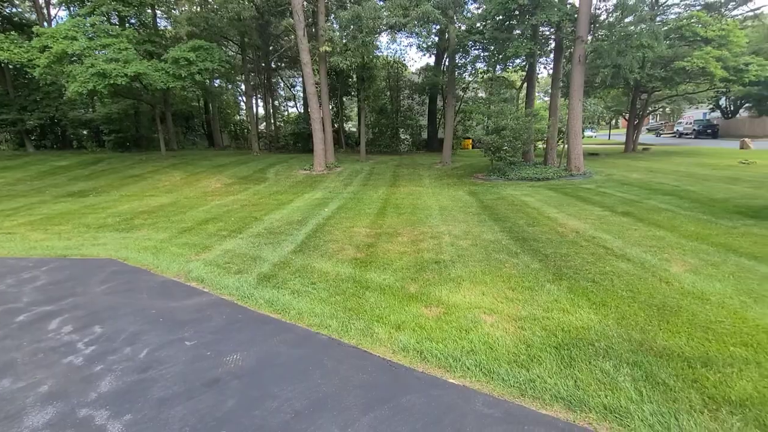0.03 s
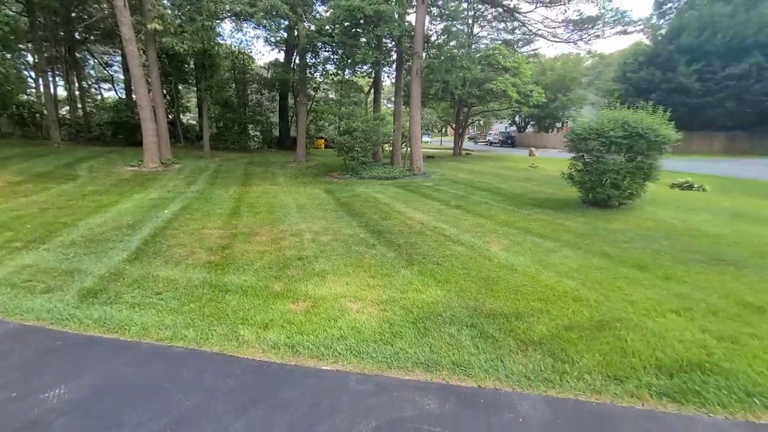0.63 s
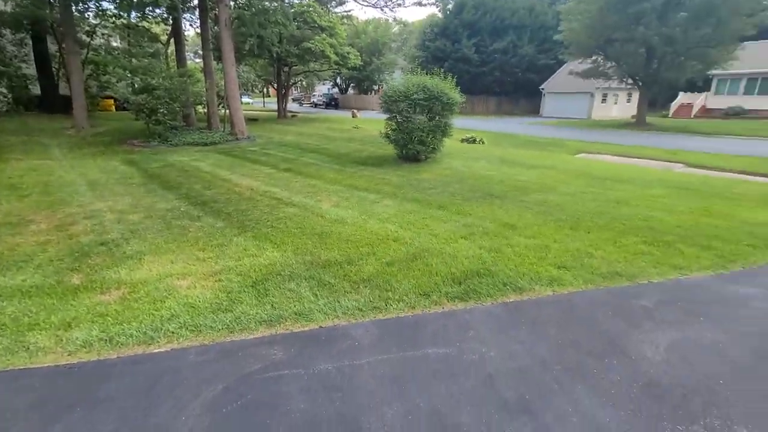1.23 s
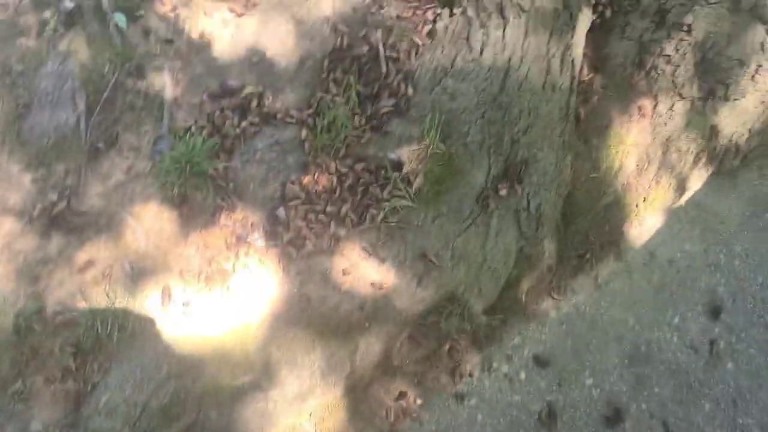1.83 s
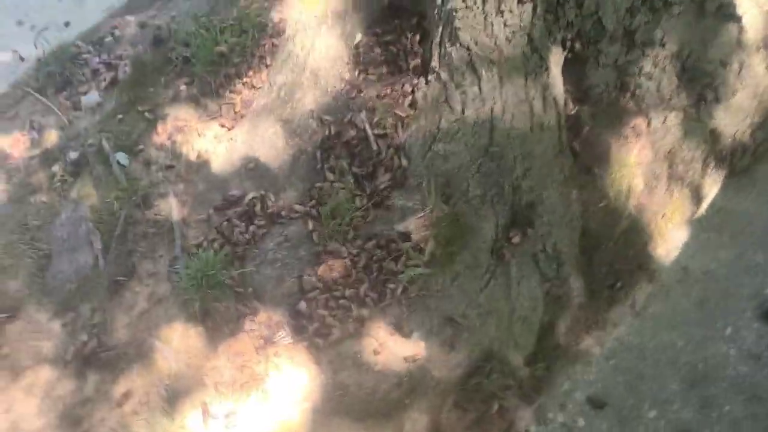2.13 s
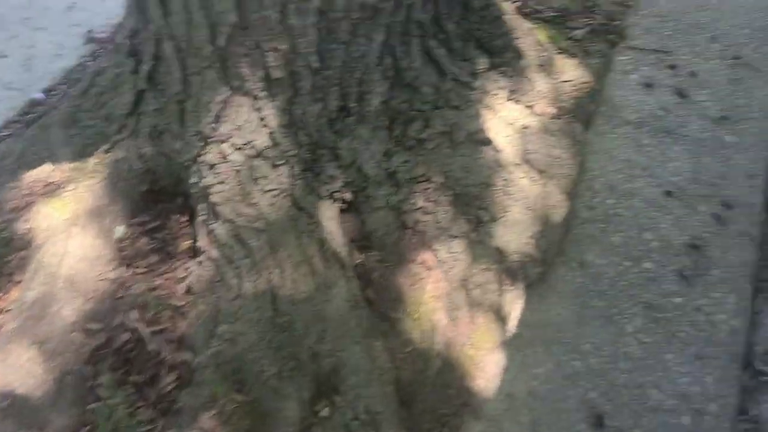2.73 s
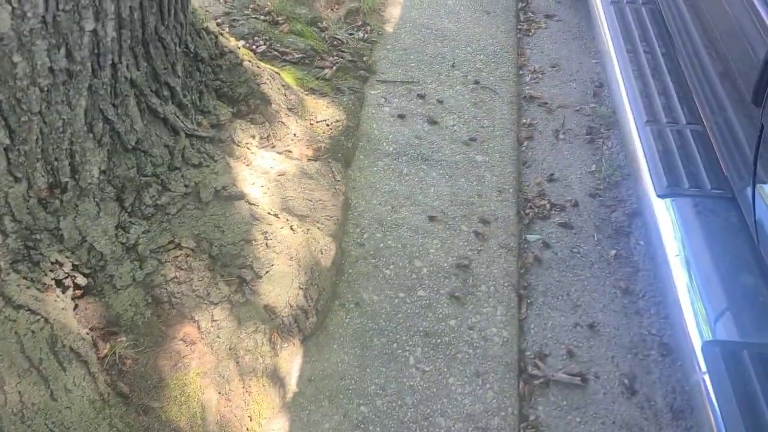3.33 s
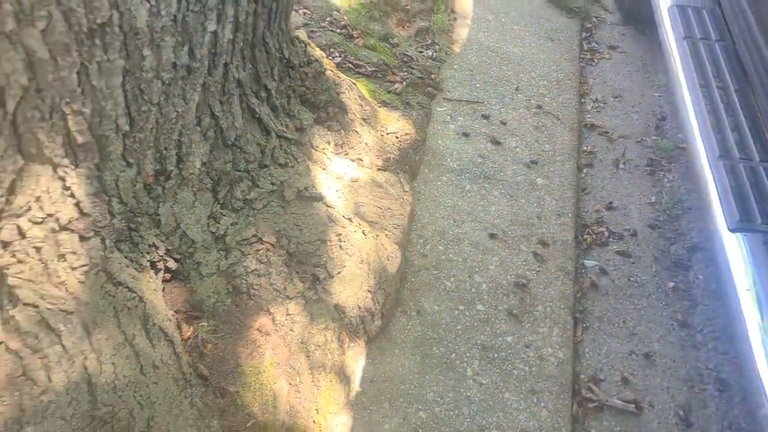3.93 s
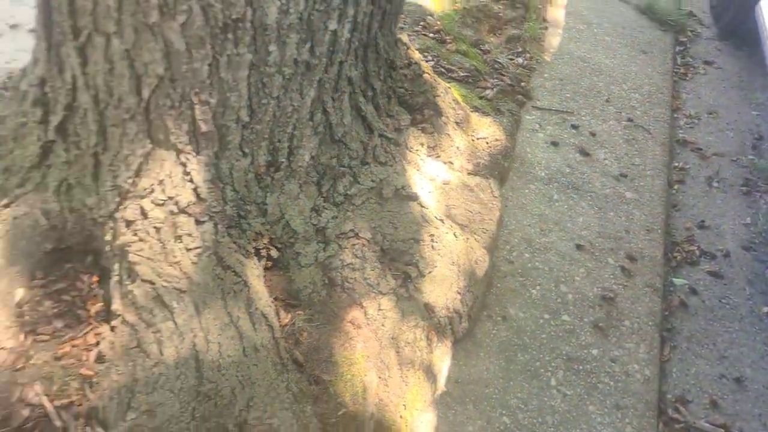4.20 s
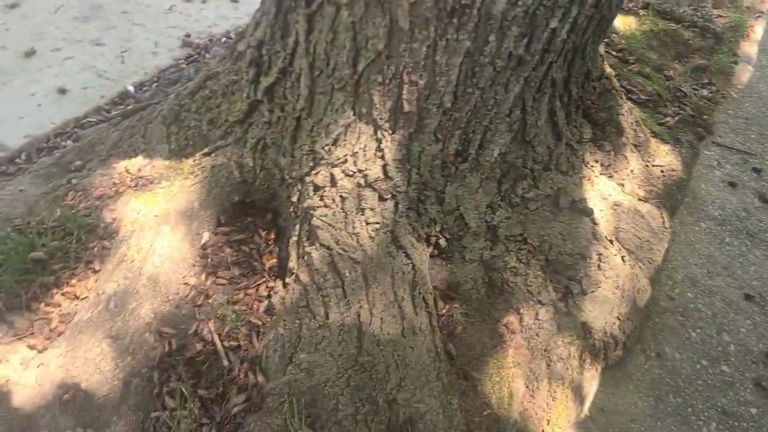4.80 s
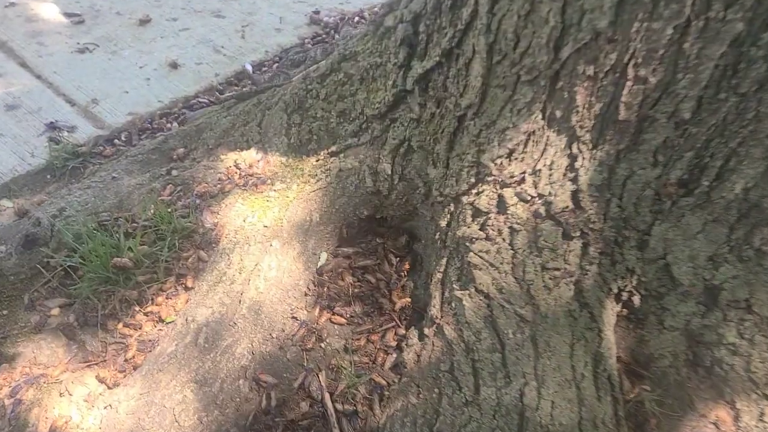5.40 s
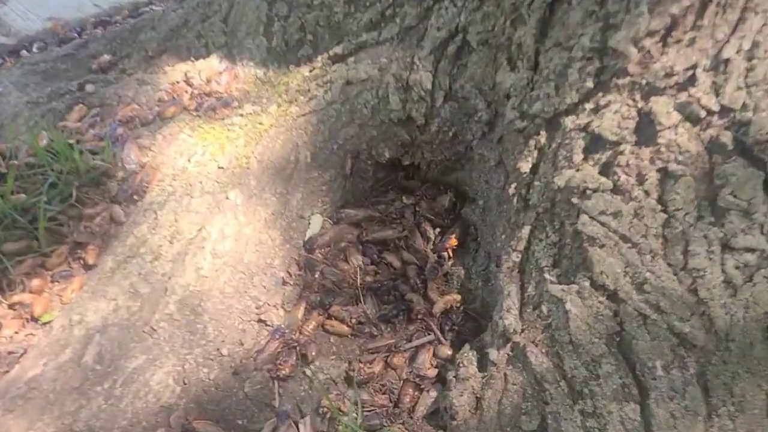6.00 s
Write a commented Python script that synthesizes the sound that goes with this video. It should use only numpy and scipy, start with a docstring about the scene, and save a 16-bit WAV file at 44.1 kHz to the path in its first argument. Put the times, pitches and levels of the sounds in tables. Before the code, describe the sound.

Cicadas drone and buzz in trees, then continue behind an idling truck's hum and fan rush as shoes crackle over dry leaves.

```python
"""Cicadas sing in suburban trees: a far, hollow drone near 1.3 kHz and a nearer, rasping buzz near 6 kHz,
made by tiny drum skins (tymbals) that click and ring their hollow bodies. We hear them first on a lawn,
where fingers knock on the hand-held phone. After an instant of silence we hear them under a street tree:
a parked truck idles, its fan rushing on the right, shoes scuff over grit and dry leaves, and a far
bird chirps."""
import sys
import numpy as np
from scipy import signal
from scipy.fft import rfft, irfft, next_fast_len
from scipy.io import wavfile
from scipy.ndimage import uniform_filter1d, map_coordinates

SR = 44100
rng = np.random.default_rng(int(sys.argv[2]) if len(sys.argv) > 2 else 0)


def generate_wav(sig):
    """Save sig (samples, or channels by samples) to the path in sys.argv[1] as 16-bit PCM at SR."""
    pcm = np.round(np.clip(np.atleast_2d(sig).T, -1, 1) * 32767).astype(np.int16)
    wavfile.write(sys.argv[1], SR, pcm)


N = 271215
TIME = np.arange(N) / SR
HIT_TIME = np.arange(-256, SR // 6) / SR  # seconds around one hit, with the contact at 0
LAWN_END_S, STREET_START_S = 1.435, 1.491

# Levels in dB are relative: 0 changes nothing. Pan is left minus right, so below 0 is to the right.
# How the droning cicadas spread over pitch. Each row: pitch in Hz, level in dB.
DRONE_PITCHES = [(1080, -19), (1170, -10.5), (1245, -7.3), (1320, -0.3), (1378, -4.5), (1440, -11),
                 (1510, -21.5), (1580, -28)]
# How a buzzing cicada's tymbals and body ring. Each row: frequency in Hz, level in dB.
CICADA_BODY = [(2600, -38), (3700, -17), (4700, -10.5), (5500, -0.5), (6250, 3.5), (6850, -4.5),
               (7500, -19.5), (8400, -23.5), (9400, -44), (12000, -22.5), (14000, -32), (16000, -40)]
# Waves of buzzing on the lawn. Each row: crest in seconds, half length in seconds, rise in dB.
LAWN_WAVES = [(0.12, 0.16, 3), (0.79, 0.24, 3.8), (1.319, 0.26, 7.7)]
# Waves of buzzing in the street. Each row: crest in seconds, half length in seconds, rise in dB.
STREET_WAVES = [(2.15, .27, 5), (2.787, 0.45, 8), (3.53, 0.2, 7.5), (4.42, 0.48, 11.5), (4.561, .09, 3),
                (5.15, 0.29, 6.5), (6.099, 0.27, 4.5)]
# How leaves dull the buzz in the street. Each row: frequency in Hz, level in dB.
FOLIAGE = [(4800, 2), (5700, 2.5), (6400, -1), (7200, -5)]

# The engine's tones (harmonics). Each row: multiple of the firing rate, level in dB.
HARMONICS = [(1, -35), (2, -11.5), (3, -6), (4, 0.15), (5, 1.5), (6, -22), (7, -11.5), (8, -17.5), (9, -17),
             (10, -11), (11, -21), (12, -14.5), (13, -30), (14, -29), (15, -35), (19, -24.5), (20, -14.5),
             (21, -22), (22, -33)]
# The exhaust at the moving phone. Each row: time in seconds, dB for harmonics 1-4, dB for 5-7.
EXHAUST_LEVELS = [(1.5, -30, -30), (2.1, -31.5, -39.5), (2.6, -26.5, -33.5), (3.0, -29, -29.5),
                  (3.35, -29, -25), (3.8, -28.5, -30.5), (4.4, -25.5, -24.5), (4.85, -29, -26.5),
                  (5.2, -36.5, -32.5), (5.6, -29.5, -26), (6.15, -32, -33.5)]
# The truck's droning body panels. Each row: time in seconds, level in dB.
PANEL_LEVELS = [(1.5, -29.5), (1.85, -33), (2.1, -24.5), (2.5, -26.5), (2.9, -28), (3.45, -35.5),
                (4.1, -35.5), (4.6, -36), (6.15, -37.5)]
# The uneven exhaust rumble. Each row: frequency in Hz, level in dB per Hz.
RUMBLE_COLOUR = [(18, -80), (30, -63), (42, -48), (54, -47), (72, -49), (96, -51.5), (120, -56.5),
                 (142, -63.5), (170, -61), (250, -66), (340, -77), (700, -100.5)]
# The rush of the fan. Each row: frequency in Hz, level in dB per Hz.
FAN_COLOUR = [(150, -78), (330, -71.5), (460, -68), (600, -67), (800, -63.5), (1100, -61.5), (1600, -68),
              (1950, -71), (2800, -78.5), (4200, -85), (7500, -96.5), (16000, -111)]
# The treble in that rush. Each row: time in seconds, boost in dB.
FAN_TREBLE = [(1.5, -3), (2.3, 0), (3.0, -0.5), (3.9, -0.5), (4.25, 1.5), (5.3, 1.5), (6.15, 2)]
# The thin hiss beside the truck. Each row: frequency in Hz, level in dB.
HISS_COLOUR = [(2000, -2), (6000, 10.5), (9000, 1.5), (10300, 10.5), (13000, 4), (16000, -1.5)]
# How loud that hiss is. Each row: time in seconds, level in dB.
HISS_LEVELS = [(1.5, -84), (2.2, -70), (2.7, -57.5), (3.4, -54.5), (3.8, -54), (4.25, -56.5), (5.2, -58),
               (6.15, -62)]

# Soft footfalls. Each row: start in seconds, peak in dB.
STEPS = [(5.352, -23.5), (5.444, -27), (5.631, -28.5)]
# A footfall's thud. Each row: frequency in Hz, level in dB.
THUD_COLOUR = [(80, -5), (260, 8), (340, -0.5), (480, -8), (1000, -20), (5000, -33), (14000, -52)]
# Grit crunches under a full sole. Each row: start in seconds, peak in dB, fade time in seconds.
CRUNCHES = [(4.140, -36, 0.11), (5.446, -30, 0.011), (5.614, -33, .06)]
# The tone of a crunch. Each row: frequency in Hz, level in dB.
CRUNCH_COLOUR = [(1200, -14), (2400, -5), (3400, 9), (5000, 3), (8000, -7), (12000, -9), (16000, -18)]
# Dry leaves crack. Each row: start in seconds, peak in dB, pan in dB.
LEAF_CRACKS = [(1.849, -37, 3.5), (2.271, -38, 0), (2.320, -39, -3), (2.336, -33, -6), (2.430, -39, -5),
               (2.632, -40, -6), (3.177, -34, -8), (3.282, -27, -9), (3.346, -38, -6), (3.424, -36, -7),
               (4.051, -39, -6), (4.650, -37, -7), (4.784, -37, -6), (4.811, -35, -9), (5.321, -36, -6),
               (5.344, -37, -6), (5.367, -37, -6), (5.394, -39, -5), (5.429, -36, -8), (5.434, -32, -5),
               (5.474, -32, -9), (5.489, -28, -8), (5.559, -32, -5), (5.607, -35, -5), (5.637, -32, -4),
               (5.671, -35, -4), (5.727, -33, -5), (5.764, -30, 0), (5.793, -25, -1), (5.856, -30.5, -11),
               (6.120, -35, -5)]
# The tone of cracking leaves and ticking grit. Each row: frequency in Hz, level in dB.
CRACK_COLOUR = [(1000, -21), (2400, 1), (3000, 2), (4500, -2), (8000, 0), (11500, 7.5), (14000, 2),
                (16000, -4)]
# A snapped twig rings. Each row: pitch in Hz, level in dB, fade time in seconds.
TWIG_TONES = [(3150, -2.5, 0.011), (4350, -5, 0.0027), (6000, 0, 0.003), (7500, -1, 0.0016),
              (10700, -1.5, 0.0017), (13600, -7, .002)]
# Soles scuff. Each row: middle in seconds, half length in seconds, level in dB, pan in dB.
SCUFFS = [(1.66, 0.096, -53.5, 12), (1.855, .02, -53, 3), (2.07, 0.087, -53.5, 9),
          (2.340, 0.009, -43.5, -6), (2.358, .014, -52, -6), (2.443, 0.086, -51, -5),
          (3.282, .012, -47, -8), (3.44, .09, -57, -7), (4.56, .07, -55, -8), (4.79, .03, -56, -7),
          (5.46, 0.1, -52, -4), (5.620, .014, -52, -6), (5.75, 0.08, -54, -1), (6.036, .04, -55, 1)]
# The tone of a scuff. Each row: frequency in Hz, level in dB.
SCUFF_COLOUR = [(2000, -10), (4000, 1), (6000, 9), (9000, -1.5), (11500, 4), (13000, 2), (16000, -7)]
# Whole leaves crumple. Each row: middle in seconds, half length in seconds, level in dB, pan in dB.
RUSTLES = [(3.47, .13, -59, -7), (3.82, .16, -60, -7), (5.49, .08, -52, -6), (5.76, .07, -53, -2)]

# Knocks on the phone. Each row: start in seconds, ring level in dB, tick in dB above that, pan in dB.
KNOCKS = [(0.950, -29.5, 4, 14), (0.956, -27, 3, 6), (1.098, -31, 16.5, 10), (1.178, -34.5, 3, 0),
          (1.225, -35, 5, 5)]
# The phone's case rings. Each row: pitch in Hz, level in dB, fade time in seconds.
CASE_TONES = [(515, -3, 0.039), (611, -8, 0.037), (744, -8, 0.037)]
# A fingertip's tick. Each row: frequency in Hz, level in dB.
TICK_COLOUR = [(250, -7), (550, 10.5), (1050, 3), (2000, 5), (2650, -2), (3200, 2.5), (4600, -2),
               (7000, -15), (15000, -25)]
# The far bird's chirps. Each row: middle in seconds, pitch in Hz, peak in dB.
CHIRPS = [(4.155, 3050, -49), (4.165, 3550, -51), (4.37, 2550, -48), (4.39, 3350, -54), (4.515, 3400, -49),
          (4.65, 3400, -51), (5.20, 2790, -48.5), (5.32, 2950, -47), (5.675, 3100, -48.5)]
# Far traffic and neighbourhood noise on the lawn. Each row: frequency in Hz, level in dB per Hz.
TRAFFIC_COLOUR = [(20, -84), (45, -69), (75, -58.5), (120, -70), (250, -74.5), (350, -82.5), (650, -86.5),
                  (950, -73.5), (1900, -78), (2800, -90), (6000, -86.5), (16000, -108)]
# How unlike the two microphones sound. Each row: frequency in Hz, their difference over their sum in dB.
STEREO_WIDTH = [(60, -23), (110, -11.5), (200, -10.5), (380, -8), (700, -4), (1290, 2), (2400, 0.5),
                (8000, 1.5)]


def cicada_drone(count=56, drift=.008, flutters_per_s=32):
    """Each far cicada holds a near-pure note; paths through leaves make it flutter differently per side."""
    pitches, levels_db = np.transpose(DRONE_PITCHES)
    chorus = np.zeros((2, N))
    for hz in np.linspace(pitches[0], pitches[-1], count):
        pitch_hz = hz * (1 + drift * wander(3))
        phase = 2 * np.pi * (np.cumsum(pitch_hz) / SR + rng.random())
        voice = np.array([np.sin(phase) * wander(flutters_per_s), np.cos(phase) * wander(flutters_per_s)])
        chorus += gain(np.interp(hz, pitches, levels_db)) * voice
    return normalise(surround(chorus))


def cicada_buzz(count=24, clicks_per_s=330, jitter=.12):
    """Many tymbals buckle in quick, uneven runs of clicks; each click rings the insect's body."""
    clicks = np.zeros((2, N))
    for insect in range(count):
        rate = clicks_per_s * rng.uniform(.7, 1.3)
        times = np.cumsum(1 + jitter * rng.standard_normal(4000)) / rate
        samples = (np.abs(times[times < N / SR]) * SR).astype(int)
        clicks[insect % 2, samples] += rng.standard_normal(len(samples))
    return normalise(colour(clicks, CICADA_BODY))


def chorus_waves(buzz, waves, usual_effort_db, speedup_per_db=.003):
    """Waves run through the chorus: the harder the cicadas sing, the louder and higher they buzz."""
    effort_db = sum(db * swell(s, half_s) for s, half_s, db in waves)
    position = np.cumsum(1 + speedup_per_db * (effort_db - usual_effort_db))  # faster sounds higher
    bent = np.array([map_coordinates(side, [position], order=5, mode="mirror") for side in buzz])
    return bent * gain(effort_db)


def truck_engine(idle_hz=22.0, sag_hz_per_s=.305, unsteadiness=.00068, waver_db=.84):
    """The slowly settling engine fires, sounding the exhaust and body panels over an uneven rumble."""
    elapsed = np.maximum(TIME - STREET_START_S, 0)
    firing_hz = (idle_hz - sag_hz_per_s * elapsed) * (1 + unsteadiness * wander(5.12))
    phase = 2 * np.pi * np.cumsum(firing_hz) / SR
    low_db, middle_db = curves(EXHAUST_LEVELS)
    panel_db, = curves(PANEL_LEVELS)
    # The panels send their highest tones in a narrow beam; outside it they are 9 dB softer.
    beam_db = panel_db + 9 * (swell(2.25, half_s=.21) - 1)
    tones = np.zeros(N)
    for multiple, db in HARMONICS:
        if multiple <= 7:
            level_db = low_db if multiple <= 4 else middle_db
        else:
            level_db = panel_db if multiple <= 14 else beam_db
        loudness = gain(db + level_db + waver_db * wander(2.995))
        tones += loudness * np.sin(multiple * phase + 2 * np.pi * rng.random())
    rumble = outdoor_noise(RUMBLE_COLOUR) * gain(.5 - .4 * elapsed)  # fades as the phone moves on
    return (tones + rumble) * pan(-1.2)


def truck_fan(fall_db_per_s=.8, flicker_db=.5, shadow_hz=1100, treble_hz=2600):
    """The cooling fan rushes under the bonnet; the phone shades its left microphone from the treble."""
    level_db = 1.53 - fall_db_per_s * (TIME - STREET_START_S)
    level_db -= 1.7 * swell(3.4, half_s=.64)  # the phone swings away
    rush = outdoor_noise(FAN_COLOUR) * gain(level_db + flicker_db * wander(12))
    treble_db, = curves(FAN_TREBLE)
    treble = colour(rush, [(treble_hz / 2, -25), (treble_hz, 0), (treble_hz * 1.6, 0), (treble_hz * 2, -15)])
    rush += treble * (gain(treble_db) - 1)
    bass = colour(rush, [(shadow_hz / 2, 0), (shadow_hz, -6), (shadow_hz * 2, -30)])
    return bass + (rush - bass) * pan(-6)


def truck_hiss(fast_flicker_db=1.5, slow_flicker_db=.7):
    """A thin, flickering hiss grows and eases as the phone passes the truck."""
    level_db, = curves(HISS_LEVELS)
    noise = rng.standard_normal((2, N))
    noise *= gain(fast_flicker_db * wander(90) + slow_flicker_db * wander(18))
    return normalise(colour(noise, HISS_COLOUR)) * gain(level_db) * pan(-10)


def footsteps(crack_fade_s=.011, thud_fade_s=.058, twig_start_s=2.5055):
    """Soles crack dry leaves, thud softly, crunch grit and snap one twig."""
    out = np.zeros((2, N))
    for s, db, pan_db in LEAF_CRACKS:
        crack = np.array([burst(crack_fade_s, CRACK_COLOUR) for side in range(2)])
        add_hit(out, s, crack * gain(db) * pan(pan_db))
    for s, db in STEPS:
        add_hit(out, s, burst(thud_fade_s, THUD_COLOUR) * gain(db))
    for s, db, fade_s in CRUNCHES:
        crunch = np.array([burst(fade_s, CRUNCH_COLOUR) for side in range(2)])
        add_hit(out, s, crunch * gain(db) * pan(-5))
    add_hit(out, twig_start_s, ring(TWIG_TONES) * gain(-19) * pan(5.5))
    return out


def shoe_scuffs(fits_db=3, sharp_db=16, stray_db=-66.5):
    """Soles grind a fine crackle out of the grit in quick fits; stray grains tick in between."""
    fine = rng.standard_normal((2, N)) * gain(fits_db * wander(90))
    sharp = grains(per_s=100) * gain(sharp_db)
    crackle = normalise(colour(fine + sharp, SCUFF_COLOUR))
    stray = normalise(colour(grains(per_s=90), CRACK_COLOUR))
    return crackle * pressure(SCUFFS) + stray * gain(stray_db) * pan(-6)


def leaf_rustle():
    """Dry leaves give way under a sole in a dense run of tiny, crisp cracks."""
    return normalise(colour(grains(per_s=900), CRACK_COLOUR)) * pressure(RUSTLES)


def phone_knocks():
    """Each knock of a finger makes a dry tick and rings the phone's case."""
    out = np.zeros((2, N))
    for s, db, tick_db, pan_db in KNOCKS:
        knock = ring(CASE_TONES) + gain(tick_db) * finger_tick()
        add_hit(out, s, knock * gain(db) * pan(pan_db))
    return out


def finger_tick(fade_s=.004):
    """A brief, hard contact holds all frequencies evenly, then takes a fingertip's tone; its peak is 1."""
    noise = rng.standard_normal(len(HIT_TIME)) * fade(fade_s)
    even_click = irfft(np.exp(1j * np.angle(rfft(noise))), len(HIT_TIME))
    tick = colour(even_click, TICK_COLOUR)
    return tick / np.abs(tick).max()


def far_bird(half_s=.018, slide_hz_per_s=-3000, warble_hz=40.1):
    """Each chirp is a short whistle that slides down and warbles a little."""
    out = np.zeros(N)
    for s, hz, db in CHIRPS:
        slide_hz = slide_hz_per_s * np.clip(TIME - s, -2 * half_s, 2 * half_s)
        pitch_hz = hz + slide_hz + warble_hz * wander(150)
        out += gain(db) * swell(s, half_s) * np.sin(2 * np.pi * np.cumsum(pitch_hz) / SR)
    return out * pan(-8)


def outdoor_noise(outline):
    """Steady noise from all around, shaped by rows of Hz and dB per Hz."""
    return colour(surround(rng.standard_normal((2, N))), outline) * np.sqrt(SR / 2)


def surround(pair):
    """Blend two unrelated sounds to come from all around: left and right are alike only in the bass."""
    shared = colour(pair[0], [(hz, -10 * np.log10(1 + gain(db) ** 2)) for hz, db in STEREO_WIDTH])
    opposed = colour(pair[1], [(hz, -10 * np.log10(1 + gain(-db) ** 2)) for hz, db in STEREO_WIDTH])
    return np.array([shared + opposed, shared - opposed])


def ring(tones):
    """A struck thing rings with a few fading tones."""
    return sum(gain(db) * fade(fade_s) * np.sin(2 * np.pi * hz * HIT_TIME) for hz, db, fade_s in tones)


def burst(fade_s, outline):
    """A short spray of contact noise with peak 1."""
    noise = colour(rng.standard_normal(len(HIT_TIME)) * fade(fade_s), outline)
    return noise / np.abs(noise).max()


def grains(per_s):
    """Lone clicks of random size at random moments."""
    return rng.standard_normal((2, N)) * (rng.random(N) < per_s / SR)


def pressure(presses):
    """Left and right loudness as soles press down and let go."""
    return sum(gain(db) * swell(s, half_s) * pan(pan_db) for s, half_s, db, pan_db in presses)


def swell(s, half_s):
    """A smooth hump: 1 at time s, about a third half_s seconds to either side."""
    return np.exp(-((TIME - s) / half_s) ** 2)


def fade(fade_s):
    """Silence until the contact, then a fall of 60 dB in fade_s seconds."""
    return (HIT_TIME >= 0) * np.exp(-np.log(1000) * np.abs(HIT_TIME) / fade_s)


def wander(per_s):
    """A random wobble of typical size 1 that turns per_s times a second."""
    hold = max(int(SR / per_s), 2)
    steps = np.repeat(rng.standard_normal(N // hold + 3), hold)
    start = rng.integers(hold)
    return normalise(uniform_filter1d(steps, hold)[start:start + N])


def colour(sound, outline):
    """Turn frequencies up or down, following rows of Hz and dB."""
    hz, db = np.transpose(outline)
    size = next_fast_len(sound.shape[-1])
    frequencies = np.maximum(np.fft.rfftfreq(size, 1 / SR), 1)
    gains = gain(np.interp(np.log(frequencies), np.log(hz), db))
    return irfft(rfft(sound, size) * gains, size)[..., :sound.shape[-1]]


def curves(table):
    """Join a table's timed rows with straight lines, one curve for each level column."""
    times, *columns = np.transpose(table)
    return [np.interp(TIME, times, column) for column in columns]


def add_hit(out, s, sound):
    """Mix in a hit whose contact falls at time s."""
    start = int((s + HIT_TIME[0]) * SR)
    out[:, start:start + sound.shape[-1]] += sound[..., :N - start]


def pan(db):
    """Make the left db louder than the right, keeping the total power."""
    gains = gain(np.array([[1], [-1]]) * db / 2)
    return normalise(gains)


def gain(db):
    """Turn decibels into a number to multiply by."""
    return 10 ** (np.asarray(db) / 20)


def normalise(sound):
    """Scale to an average power of 1."""
    return sound / np.sqrt(np.mean(sound ** 2))


def scene():
    """The same chorus from the lawn, then from the street, with a moment of silence between."""
    drone, buzz = cicada_drone(), cicada_buzz()
    lawn = drone * gain(-30) * pan(-4)
    lawn += chorus_waves(buzz, LAWN_WAVES, usual_effort_db=4) * gain(-38) * pan(-1)
    lawn += outdoor_noise(TRAFFIC_COLOUR) * pan(-1) + phone_knocks()
    street = drone * gain(-26 + 1.9 * swell(2.15, half_s=.3)) * pan(-2)
    dull_buzz = colour(buzz, FOLIAGE)
    street += chorus_waves(dull_buzz, STREET_WAVES, usual_effort_db=12) * gain(-57) * pan(-7.5)
    street += truck_engine() + truck_fan() + truck_hiss()
    street += shoe_scuffs() + footsteps() + leaf_rustle() + far_bird()
    return lawn * (TIME < LAWN_END_S) + street * (TIME >= STREET_START_S)


def record(dry, top_hz=15850):
    """The phone cuts off the highest treble."""
    return signal.sosfilt(signal.ellip(10, .2, 80, top_hz, fs=SR, output="sos"), dry)


dry = scene()
out = record(dry)
generate_wav(out)
```